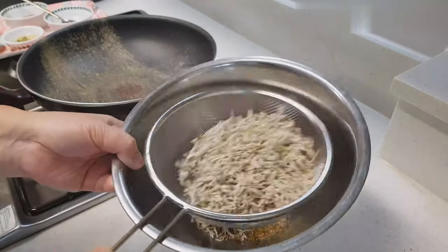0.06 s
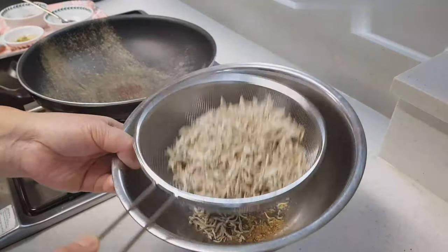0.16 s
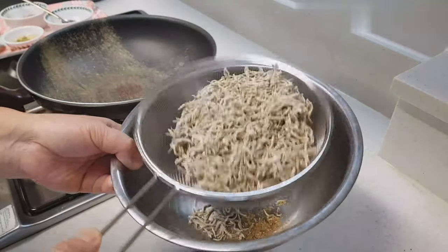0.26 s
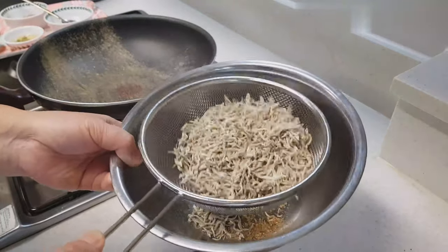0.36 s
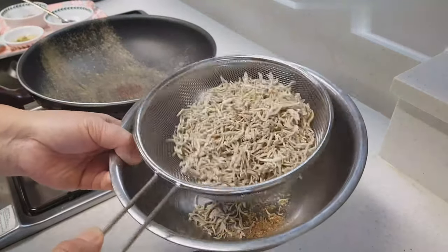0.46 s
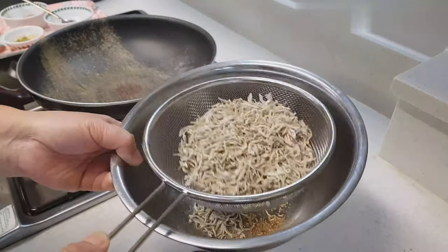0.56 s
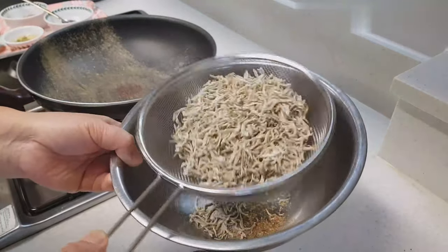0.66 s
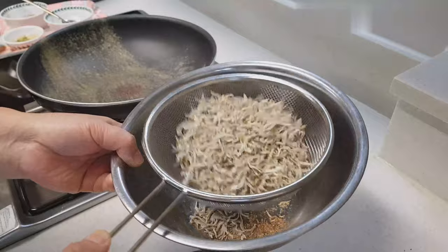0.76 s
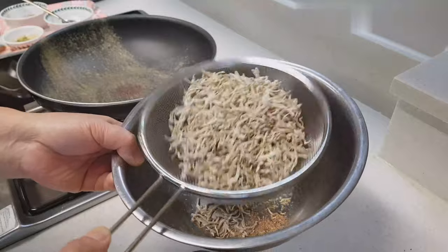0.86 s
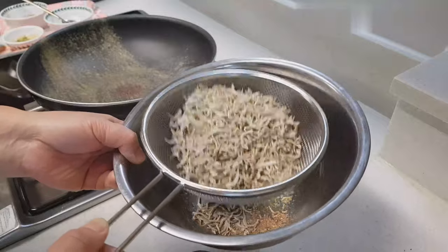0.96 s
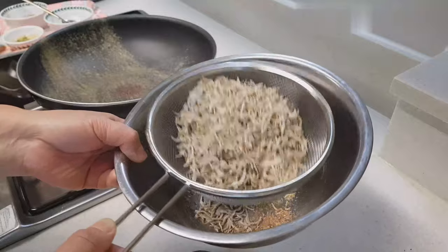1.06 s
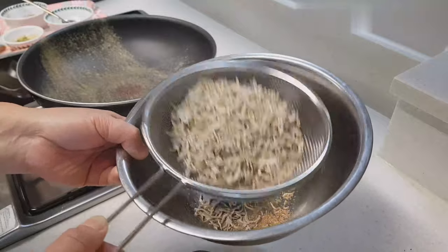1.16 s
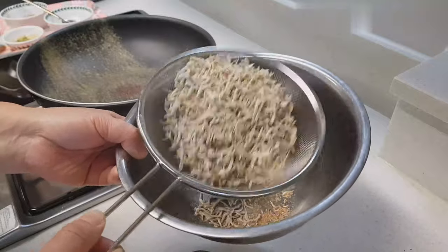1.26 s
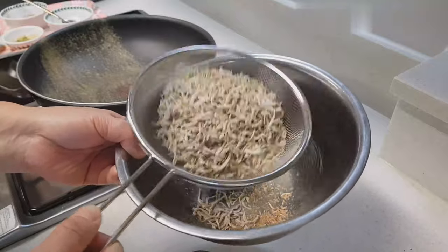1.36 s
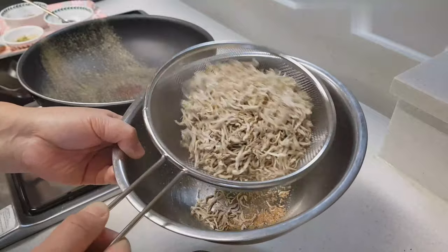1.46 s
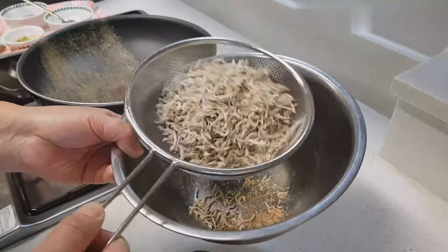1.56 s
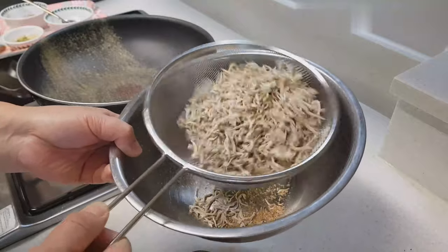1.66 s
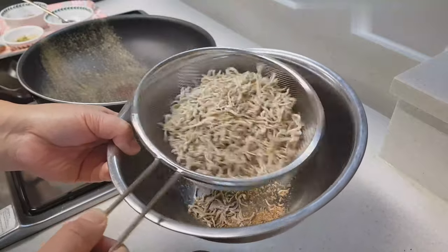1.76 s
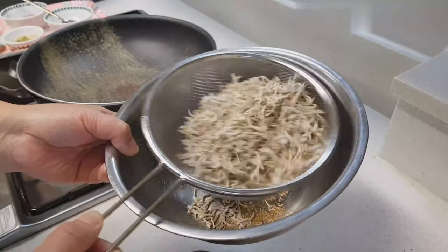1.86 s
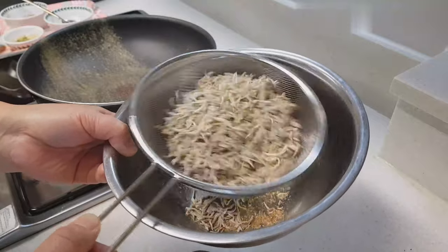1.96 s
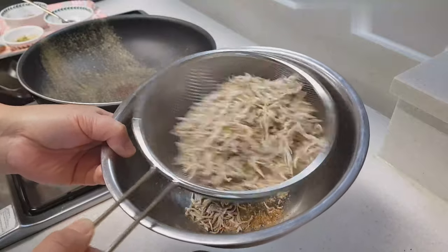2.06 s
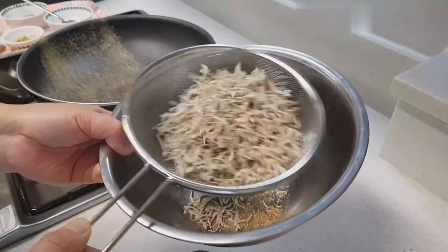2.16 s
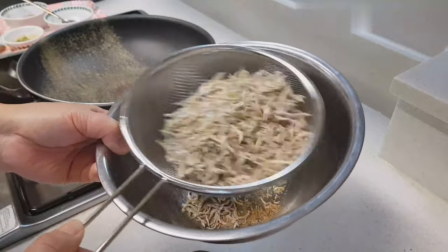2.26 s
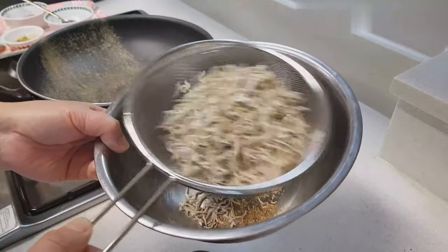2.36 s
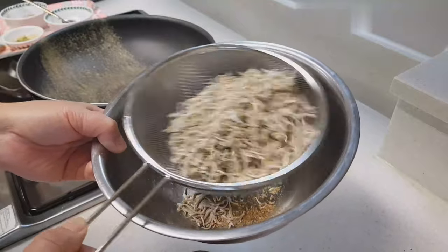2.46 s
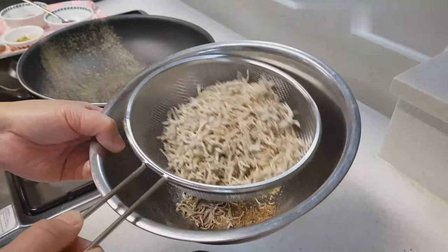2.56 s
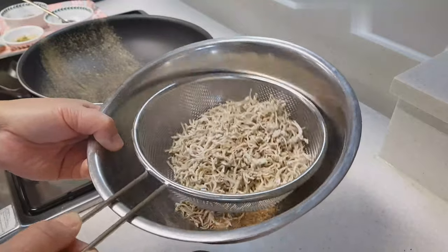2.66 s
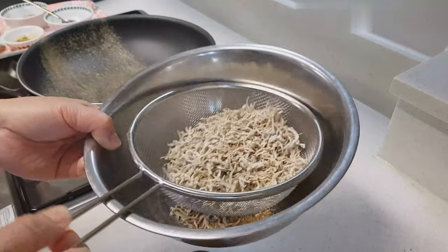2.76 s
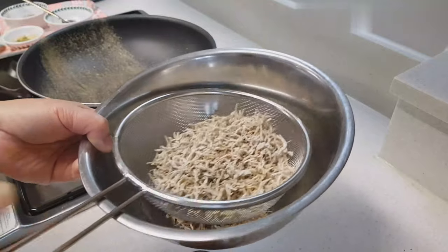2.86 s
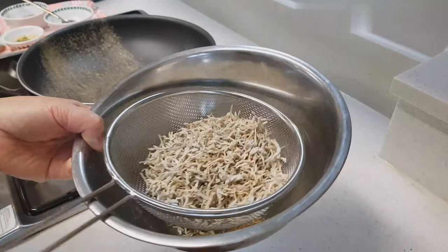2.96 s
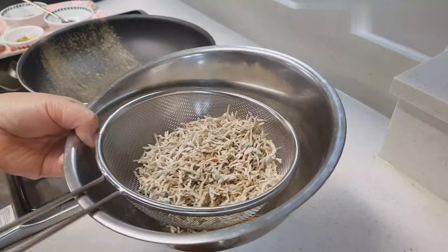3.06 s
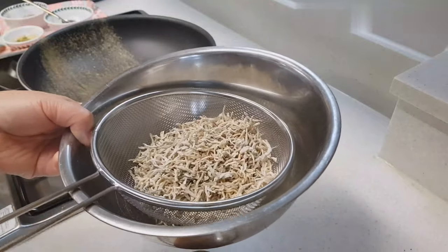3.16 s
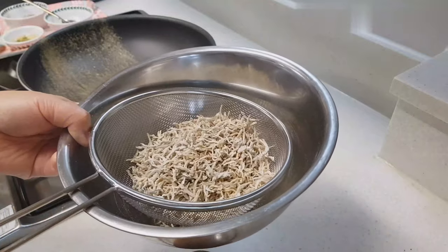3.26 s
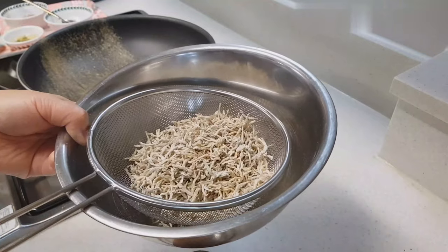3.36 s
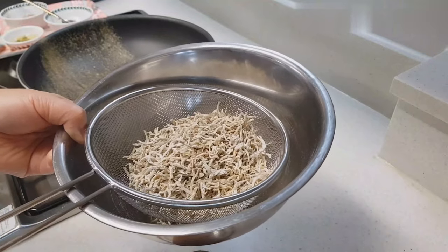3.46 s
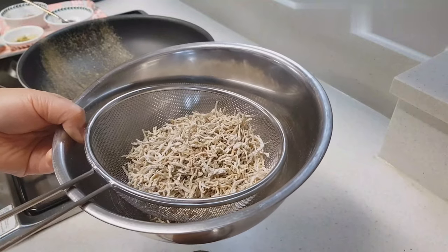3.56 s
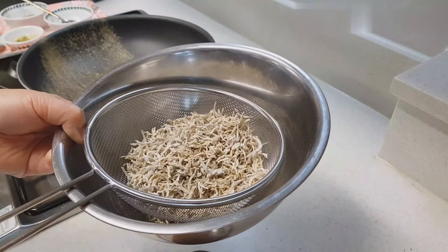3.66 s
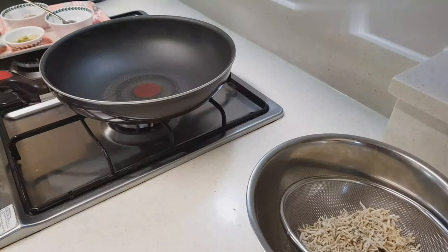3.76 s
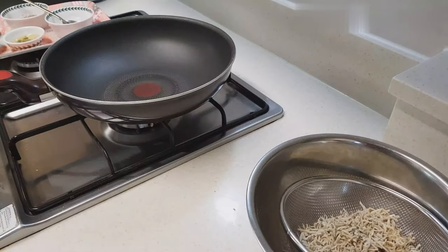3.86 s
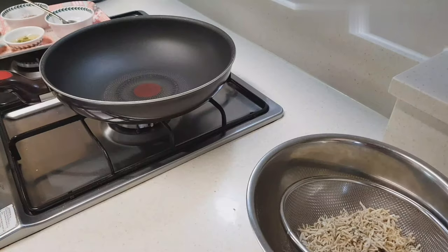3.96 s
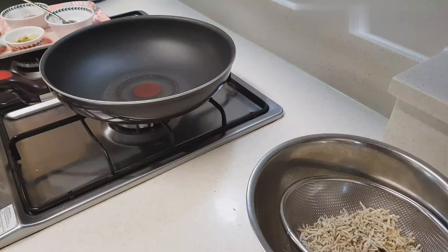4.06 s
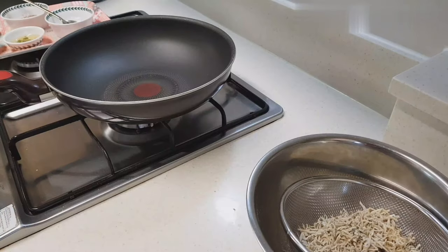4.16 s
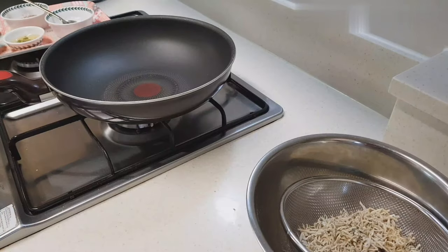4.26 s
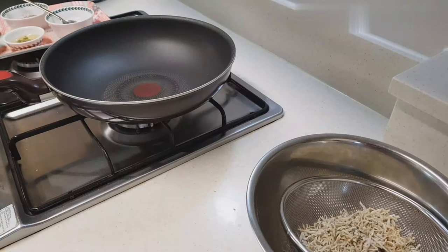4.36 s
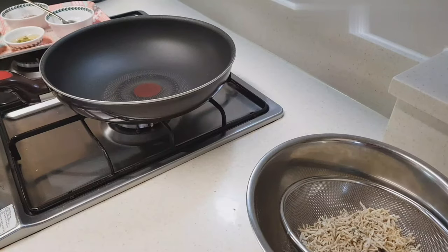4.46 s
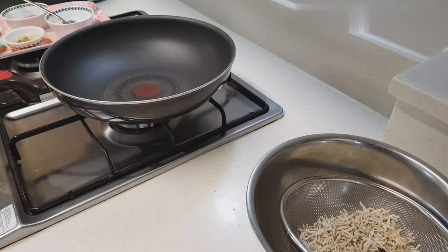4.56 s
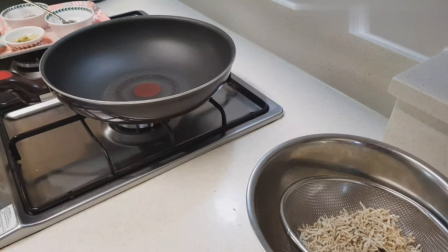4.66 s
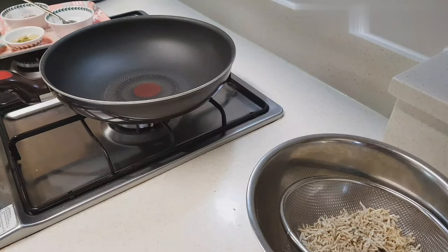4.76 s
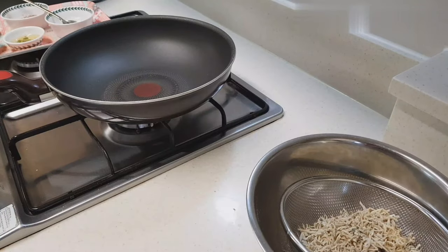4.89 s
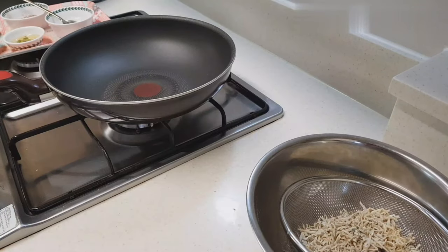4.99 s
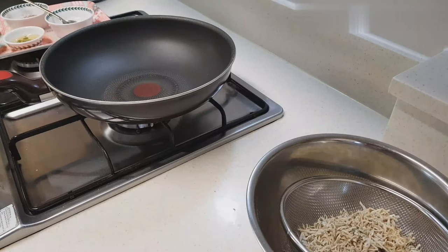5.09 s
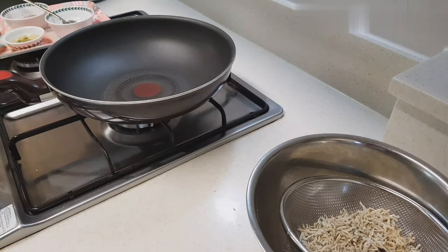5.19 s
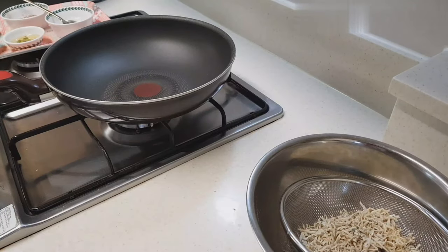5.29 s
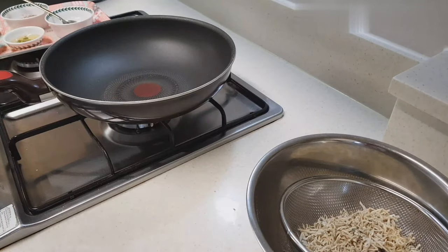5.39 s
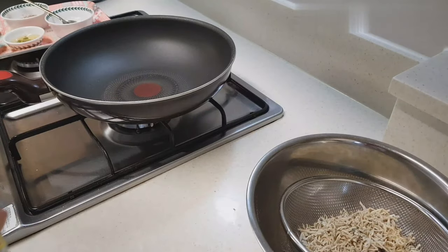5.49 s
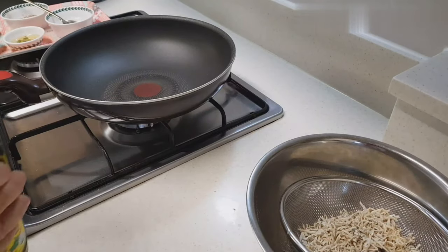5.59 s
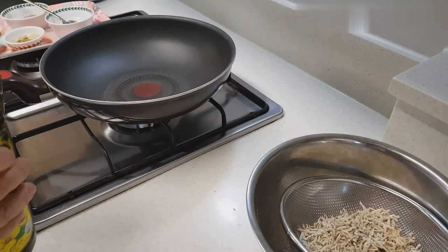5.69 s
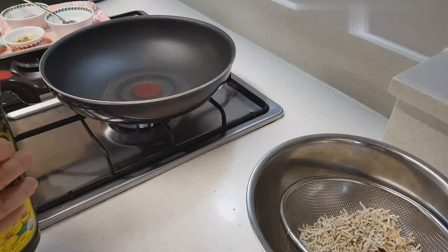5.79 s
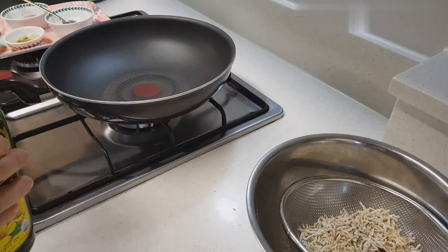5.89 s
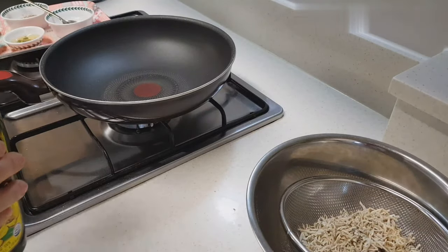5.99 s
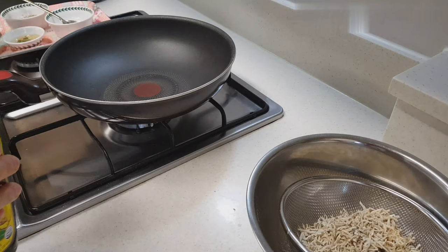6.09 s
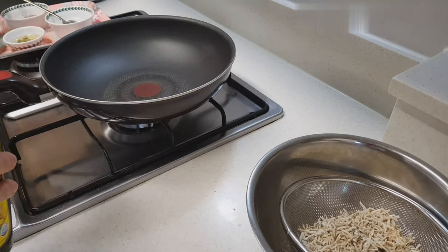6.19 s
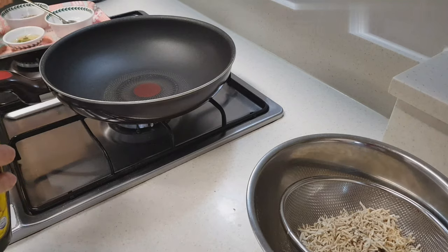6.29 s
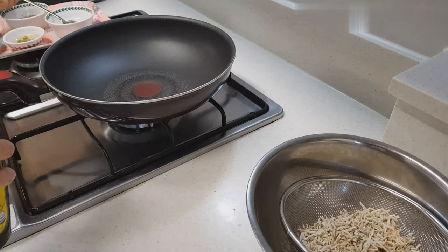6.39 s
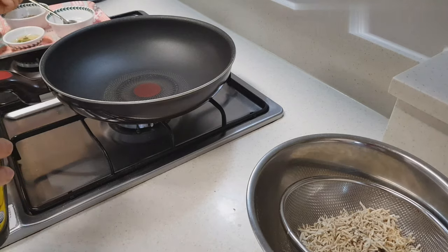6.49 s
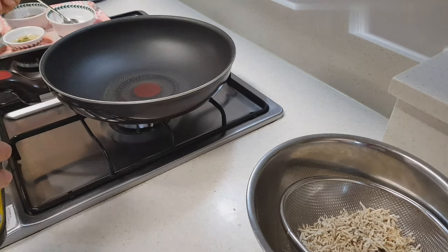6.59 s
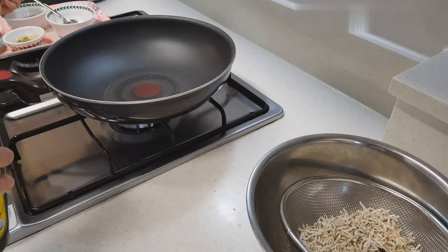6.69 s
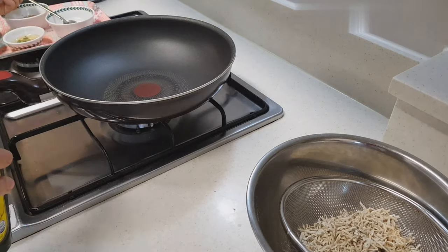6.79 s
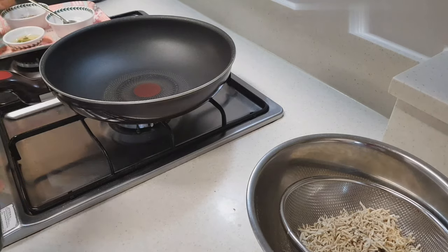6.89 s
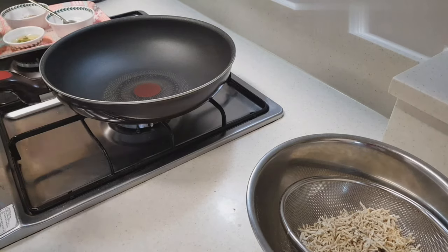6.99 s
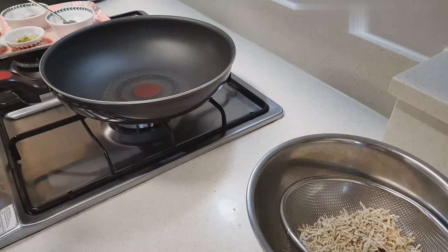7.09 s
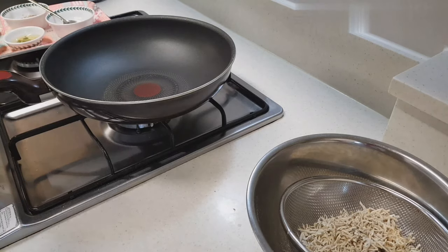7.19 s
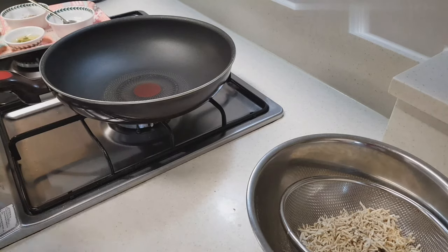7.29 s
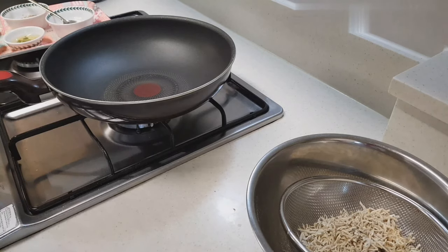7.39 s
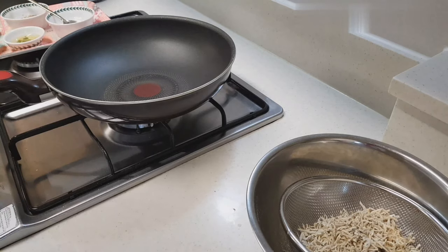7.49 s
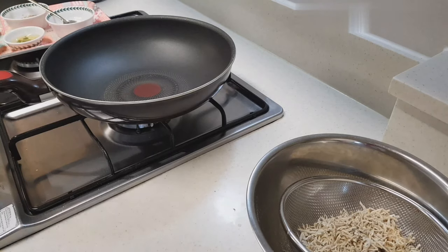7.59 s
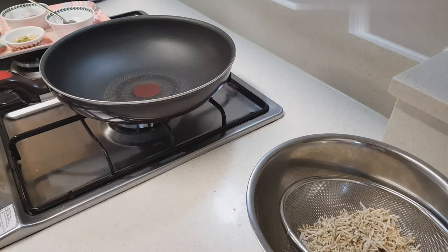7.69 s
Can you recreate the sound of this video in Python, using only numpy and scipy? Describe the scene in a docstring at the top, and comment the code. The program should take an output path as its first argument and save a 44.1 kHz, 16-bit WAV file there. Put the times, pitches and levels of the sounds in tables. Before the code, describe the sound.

In a small kitchen, a cooker hood gives a steady low hum and soft rush of air. Close by, tiny dried fish swish repeatedly over wire mesh while the strainer taps a steel bowl, ending in louder ringing knocks. The sound cuts out briefly. The hum returns with light ticks, a hard clack, soft brushing and the short, dull clatter of something being set down.

```python
"""A small kitchen, under a humming cooker hood: dried anchovies are tossed in a wire strainer over a
steel bowl. The fish hiss over the mesh in thousands of tiny contacts; the strainer clinks on the bowl
and is dropped into it, so the bottom thumps and the wall rings. After a short silent break, things are
handled and put down beside the stove: faint ticks, soft brushing, one bright clack and a dull clatter."""
import sys
import numpy as np
from scipy import signal
from scipy.fft import rfft, irfft, next_fast_len
from scipy.io import wavfile
from scipy.ndimage import map_coordinates

SR = 44100
rng = np.random.default_rng(int(sys.argv[2]) if len(sys.argv) > 2 else 0)


def wrap_up_sound(samples):
    """Save the sound to the file named by the first command line argument, as 16-bit audio."""
    columns = np.atleast_2d(samples).T
    # keep every value between -1 and 1, then stretch to whole-number steps
    tamed = np.clip(columns, -1, 1)
    steps = np.round(tamed * 32767).astype(np.int16)
    wavfile.write(sys.argv[1], SR, steps)


N = 341334
TIME = np.arange(N) / SR


def from_db(db):
    return 10 ** (np.asarray(db) / 20)


def unit_rms(x):
    return x / np.sqrt(np.mean(x ** 2) + 1e-20)


def white():
    return rng.standard_normal((2, N))


def pan(x, right_db):
    """Place a sound so that the right side is right_db above the left."""
    return x * from_db(np.array([[-right_db], [right_db]]) / 2)


def at_hz(points, hz):
    """Read a curve on a log-frequency axis."""
    f, value = np.transpose(points)
    return np.interp(np.log(hz + 1), np.log(f), value)


def coloured(source, spectrum, correlation, peaks=()):
    """Give two unrelated signals an EQ curve, a stereo width and resonant peaks; rms 1."""
    size = next_fast_len(N)
    hz = np.arange(size // 2 + 1) * SR / size
    peaks_db = sum(db / (1 + (2 * (hz - f) / width) ** 2) for f, width, db in peaks)
    mid, side = rfft(source, size) * from_db(at_hz(spectrum, hz) + peaks_db)
    alike = np.clip(at_hz(correlation, hz), -1, 1)
    stereo = np.sqrt(1 + alike) * mid + np.sqrt(1 - alike) * side * [[1], [-1]]
    return unit_rms(irfft(stereo, size)[:, :N])


def band(x, low_hz, high_hz):
    """One register of a sound; rms 1."""
    sos = signal.butter(2, [low_hz, min(high_hz, .45 * SR)], "band", fs=SR, output="sos")
    return unit_rms(signal.sosfilt(sos, x))


def drift(per_s):
    """Random modulation gliding through per_s values a second; rms 1."""
    knots = rng.standard_normal(2048)
    return unit_rms(map_coordinates(knots, [TIME * per_s], order=1, mode="wrap"))


def ring(clicks, hz, t60):
    """A unit click sets a sine of height 1 ringing."""
    r, w = from_db(-60 / (t60 * SR)), 2 * np.pi * hz / SR
    return signal.lfilter([0, np.sin(w)], [1, -2 * r * np.cos(w), r * r], clicks + 1e-18)


def blows(times, levels_db, rise, t60):
    """Envelope of blows that build up during the contact and then die away; they add in power."""
    power, age = np.zeros(N + SR), np.arange(SR // 2) / SR
    for s, db, contact in zip(times, levels_db, np.broadcast_to(rise, len(times))):
        start = int(s * SR)
        attack = 1 - np.exp(-age / max(contact, 1e-4))
        power[start:start + len(age)] += (attack * from_db(db - 60 * age / t60)) ** 2
    return np.sqrt(power[:N])


def strokes(rows, sag_db_per_s, fade_db_per_s):
    """Envelope of strokes: each gains 20 dB over its swell, sags while it slides, then fades."""
    power = 1e-14
    for s, swell, db, slide in rows:
        age = TIME - s - swell
        shape_db = 20 * np.minimum(age, 0) / max(swell, 1e-3)
        shape_db -= sag_db_per_s * np.clip(age, 0, slide) + fade_db_per_s * np.maximum(age - slide, 0)
        power = power + from_db(np.maximum(db + shape_db, -150)) ** 2
    return np.sqrt(power)


def kitchen(x, t60, wet_db, predelay_s=0.0026):
    """Hard walls close by return a short dense tail, different on each side."""
    age = np.arange(SR // 2) / SR
    tail = rng.standard_normal((2, len(age))) * from_db(-60 * age / t60) * (age > predelay_s)
    tail /= np.sqrt(np.sum(tail ** 2, axis=1, keepdims=True))
    return x + from_db(wet_db) * signal.fftconvolve(x, tail, axes=1)[:, :N]


# the hood's level as it changes over time: t/s, fan level/dB, air level/dB
HOOD_LEVELS = [(0, -36, -50), (1.6, -37.5, -50), (2.3, -33.5, -47), (3.0, -35.5, -48), (3.8, -36, -48.5),
               (4.0, -33.5, -46), (5.2, -33, -46.5), (5.8, -35, -47), (7.7, -34, -46.5)]
# EQ of the fan's rumble: f/Hz, level/dB
RUMBLE_EQ = [(20, -37), (40, -28), (60, -17), (76, 0), (84, -5), (95, -3.5), (108, -18), (130, -11),
             (162, -4), (198, -22.5), (238, -12.5), (300, -23.5), (400, -54.5), (700, -57.5)]
# EQ of the rushing air: f/Hz, level/dB
AIR_EQ = [(180, -21), (280, -8.5), (345, -6), (480, -4), (560, 0), (740, -3.5), (850, -11.5), (1400, -9.5),
          (1800, -13.5), (2250, -16.5), (2700, -14.5), (3300, -19.5), (8000, -30), (16000, -41)]
# resonances of the duct: f/Hz, width/Hz, boost/dB
DUCT_PEAKS = [(458.5, 34, 4), (522, 55, 7), (597, 21, 4.5), (670, 49, 2), (902, 30, 7.5), (956, 32, 7),
              (1048, 16, 3.5), (1076, 50, 9.5), (1201, 38, 5.5), (1283, 30, 7.5), (1450, 80, 6.5),
              (1723, 47, 6), (1915, 43, 7.5), (2088, 100, 7), (2430, 77, 4.5)]
# partials of the motor hum: f/Hz, level against the fan level/dB, pan right/dB
MOTOR_PARTIALS = [(119.54, .5, 2.0), (239.4, -21.5, -2)]
# stereo image of the hood, wider toward the top: f/Hz, left-right correlation
HOOD_IMAGE = [(60, 1), (150, 1), (260, 0.75), (550, 0.61), (1000, 0.24), (2000, 0.1), (16000, 0)]

def hood(rumble_gain_db=-2, air_gain_db=4, waver_db=1.0, waver_radians=0.15):
    """The bed: the motor hums over the low rumble of the fan; air rushes through the duct."""
    times, *levels = np.transpose(HOOD_LEVELS)
    fan_db, air_db = (np.interp(TIME, times, level) for level in levels)
    rumble = from_db(fan_db + rumble_gain_db) * coloured(white(), RUMBLE_EQ, HOOD_IMAGE)
    air = from_db(air_db + air_gain_db) * coloured(white(), AIR_EQ, HOOD_IMAGE, DUCT_PEAKS)
    hum = 0
    for hz, db, right_db in MOTOR_PARTIALS:
        tone = np.sqrt(2) * np.sin(2 * np.pi * hz * TIME + waver_radians * drift(3.8))
        hum = hum + pan(tone * from_db(fan_db + db + waver_db * drift(9)), right_db)
    return hum + rumble + pan(air, right_db=0.3)


# faint dry ticks: t/s, level/dB
TICK_CUES = [(4.335, -40), (4.5062, -44), (4.6464, -41), (4.823, -38)]
# soft brushing strokes: t/s, swell/s, level/dB, slide/s
BRUSH_CUES = [(5.62, 0.044, -58, .005), (5.7, 0.1, -55, .015), (7.33, .16, -54, .13)]
# crisp EQ of ticks and brushing: f/Hz, level/dB
HANDLING_EQ = [(2000, -6), (5000, -2), (8000, 1), (9500, -4), (12000, 1.5), (15500, -9.5)]
# stereo image of this and all the other close sounds: f/Hz, left-right correlation
CLOSE_IMAGE = [(300, 0.9), (600, 0.81), (1200, -0.1), (3500, -0.24), (16000, 0.05)]

def handling(tick_db=-9, brush_db=-1):
    """Things tick and brush softly as they are handled."""
    times, level_db = np.transpose(TICK_CUES)
    ticks = blows(times, level_db + tick_db, rise=.001, t60=.13)
    brushing = from_db(brush_db) * strokes(BRUSH_CUES, sag_db_per_s=50, fade_db_per_s=130)
    return (ticks + brushing) * coloured(white(), HANDLING_EQ, CLOSE_IMAGE)


# knocks beside the stove: t/s, low level/dB, mid level/dB, high level/dB, contact/s
KNOCK_CUES = [(6.523, -35.5, -34.5, -47, 0.0027), (6.822, -20, -14, -25.5, 0.01),
              (6.833, -26, -25.5, -42, .004), (6.869, -23.5, -21.5, -32.5, 0.0052)]
# hollow EQ of that clatter: f/Hz, level/dB
KNOCK_EQ = [(250, -19), (480, -17.5), (620, -1), (740, 1.5), (900, 2), (1150, -7.5), (1400, -5),
            (1700, -9.5), (2500, -13), (3300, -14.5), (4500, -9.5), (10000, -24), (13000, -26.5),
            (15500, -46)]

def knocks(low_db=3, mid_db=3, high_db=4):
    """Something is set down and rocks with a dull clatter; the treble starts first and dies first."""
    times, low, mid, high, contact = np.transpose(KNOCK_CUES)
    body = coloured(white(), KNOCK_EQ, CLOSE_IMAGE)
    clatter = band(body, 250, 805) * blows(times, low + low_db, contact, t60=.14)
    clatter += band(body, 990, 3250) * blows(times, mid + mid_db, contact * 1.38, t60=0.11)
    clatter += band(body, 4100, SR / 2) * blows(times, high + high_db, contact * 0.43, t60=0.08)
    return pan(clatter, right_db=-0.5)


# one hard, bright clack beside the stove: t/s, body level/dB, treble level/dB
CLACK_CUE = (5.3455, -13, -20)
# EQ of the clack: f/Hz, level/dB
CLACK_EQ = [(250, -4.5), (450, -5), (720, -4.5), (1020, -1), (1350, -7), (1830, 2.5), (2050, -4.5),
            (2400, 1), (3100, -5.5), (4200, -13), (5800, -13), (7000, -19), (9200, -17), (15500, -26)]

def clack(crack_db=6):
    """A crack of a few milliseconds, then the struck body dies away."""
    s, body_db, treble_db = CLACK_CUE
    noise = coloured(white(), CLACK_EQ, CLOSE_IMAGE)
    body = band(noise, 210, 3300) * blows([s], [body_db], rise=0.00061, t60=0.088)
    treble = band(noise, 3700, 19000) * blows([s], [treble_db], rise=0.001, t60=0.15)
    crack = noise * blows([s], [body_db + crack_db], rise=0.00041, t60=0.0077)
    return pan(body + treble + crack, right_db=-1.5)


# the harder blows on the bowl: t/s, level/dB, f/Hz
THUMP_CUES = [(1.137, -21, 537), (2.459, -38, 527), (2.67, -15, 528), (2.718, -12, 597),
              (2.963, -25.5, 550)]
# wall notes that sing on after a thump: f/Hz, level against the thump/dB, t60/s
THUMP_TAILS = [(658, -17.5, 0.14), (2590, -22.5, 0.13)]

def bowl_bottom(gain_db=5, rise=.002, t60=0.036):
    """The flat bottom flexes: a hollow note, damped by hand and fish; the wall sings a little longer."""
    note = 0
    for s, db, hz in THUMP_CUES:
        note += blows([s], [db + gain_db], rise, t60) * np.sin(2 * np.pi * hz * (TIME - s))
    times, thump_db, _ = np.transpose(THUMP_CUES)
    for hz, db, wall_t60 in THUMP_TAILS:
        note += blows(times, thump_db + db, rise, wall_t60) * np.sin(2 * np.pi * hz * TIME)
    return pan(note, right_db=0)


# strainer hits on the bowl: t/s, body level/dB, ring level/dB, wire level/dB, contact/s
CLINK_CUES = [(0.143, -48, -40.5, -43, 0.00063), (0.71, -60, -51, -40.5, .0005),
              (0.842, -56, -51, -42.5, .001), (0.89, -58, -52, -50, 0.00092),
              (1.1374, -27.5, -19, -19.5, 0.0016), (1.575, -49, -48, -43.5, .0004),
              (1.8817, -40.5, -34.5, -36.5, 0.00087), (2.457, -26, -20, -17.5, 0.0022),
              (2.658, -35.5, -34, -32.5, 0.00064), (2.6698, -21.5, -15.5, -15.5, 0.00061),
              (2.717, -26.5, -25.5, -26, 0.0019), (2.797, -64, -42.5, -43.5, .001),
              (2.895, -43, -34.5, -36, 0.0012), (2.96, -37, -33, -33.5, 0.00074)]
# EQ of the steel's crowded modes: f/Hz, level/dB
STEEL_EQ = [(700, -11.5), (1400, -4), (2000, -13), (2900, 3.5), (3500, 1), (5200, -4.5), (6600, 2.5),
            (7400, 6), (8250, 10), (9100, -1.5), (11900, -2.5), (15500, -14)]

def strainer(body_db=2, ring_db=4, wire_db=5, chatter_db=0.5):
    """The rim hits the bowl: a crash of crowded, hand-damped modes."""
    times, body, rings, wire, contact = np.transpose(CLINK_CUES)
    steel = coloured(white(), STEEL_EQ, CLOSE_IMAGE)
    crash = band(steel, 860, 2760) * blows(times, body + body_db, contact * 0.45, t60=0.1)
    crash += band(steel, 3020, 5850) * blows(times, rings + ring_db, contact, t60=0.062)
    crash += band(steel, 7030, 17000) * blows(times, wire + wire_db, contact * 1.3, t60=0.068)
    chatter = from_db(chatter_db * drift(900))   # hard surfaces touch and part within one blow
    return pan(crash * chatter, right_db=1.3)


# long-ringing modes of the bowl: f/Hz, level/dB, t60/s
BOWL_MODES = [(573, -4, .24), (813, 0.5, 0.069), (1810, -9, 0.068), (2510, -12.5, 0.16), (3450, -9.5, 0.14),
              (4040, -11, .14), (4393, -19.5, .13), (5440, -13, .14), (7400, -13, .17), (7300, -13, .17),
              (7714, -12.5, 0.16), (8260, -13, .17), (12000, -16, .13)]

def bowl_wall(modes_db=-6, scatter_db=1.0):
    """A few modes ring on after each clink, each time with a strength and sign of their own."""
    times, body, rings, wire, _ = np.transpose(CLINK_CUES)
    ringing = 0
    for hz, db, t60 in BOWL_MODES:
        blow_db = (body if hz < 2800 else rings if hz < 6500 else wire) + db + modes_db
        sides = 1 if hz < 1000 else 2   # low modes are in phase on both sides
        strength = from_db(blow_db + scatter_db * rng.standard_normal((sides, len(times))))
        clicks = np.zeros((2, N))
        clicks[:, (times * SR).astype(int)] = strength * rng.choice([-1, 1], strength.shape)
        ringing = ringing + ring(clicks, hz, t60)
    return pan(ringing, right_db=1.5)


# tosses that send the fish sliding over the mesh: t/s, swell/s, level/dB, slide/s
TOSS_CUES = [ (-0.02, 0.017, -42.5, .005), (0.035, 0.037, -55, .07), (0.355, 0.019, -38.5, 0.029),
             (0.52, 0.078, -50, .015), (0.75, 0.034, -42.5, .04), (0.94, 0.034, -41, 0.027),
             (1.335, 0.012, -41, 0.046), (1.46, 0.057, -50, 0.14), (1.665, 0.047, -50, 0.12),
             (1.88, .05, -50.5, 0.092), (2.03, .07, -49, 0.11), (2.23, .085, -45, 0.036),
             (2.37, .025, -53, 0.06), (2.5, 0.054, -47.5, 0.028), (2.965, 0.017, -50, 0.0074), ]
# EQ of the fish's hiss: f/Hz, level/dB
FISH_EQ = [(1200, -24.5), (2800, -10.5), (4900, -10.5), (5300, -8), (5900, -7), (6500, -1), (7800, -2),
           (9500, -5), (12000, -6.5), (15500, -13)]
# colour that the wire mesh adds: f/Hz, width/Hz, boost or cut/dB
MESH_PEAKS = [(5330, 200, 5.5), (6770, 150, 6), (7100, 200, -1.5), (7760, 300, 2.5)]

def fish(peak_contacts_per_s=9000, size_spread_db=4.0, gain_db=3.0):
    """Thousands of tiny contacts with the wires; a faster slide makes more of them."""
    # friction slows each slide, then the heap comes to rest
    slide = strokes(TOSS_CUES, sag_db_per_s=46, fade_db_per_s=340)
    moving = slide > from_db(-85)
    rate = peak_contacts_per_s * np.sqrt(slide / slide.max())
    contacts = (rng.random((2, N)) < rate / SR) * white()
    sizes = from_db(size_spread_db * np.minimum(rng.exponential(1, (2, N)), 4))
    grains = contacts * sizes * moving / np.sqrt(rate)   # equal power at any density
    hiss = coloured(kitchen(grains, t60=.12, wet_db=7.5), FISH_EQ, CLOSE_IMAGE, MESH_PEAKS)
    hiss /= np.sqrt(np.mean(hiss[:, moving] ** 2))
    return pan(hiss * slide * from_db(gain_db), right_db=.6)


def scene():
    """The mix: hood bed, foley beside the stove, steel bowl and strainer, fish."""
    clinks = kitchen(strainer(), t60=0.24, wet_db=-6.5) + bowl_wall()
    thumps = kitchen(bowl_bottom(), t60=0.13, wet_db=-1.5)
    beside_stove = kitchen(knocks() + clack(), t60=0.25, wet_db=-4)
    return hood() + handling() + beside_stove + thumps + clinks + fish()


# the silent break: start t/s, end t/s
MUTE = (3.783, 4.035)

def record(dry, cutoff_hz=15800):
    """The sound mutes for a moment and comes back; a steep low-pass cuts the top."""
    stop, resume = MUTE
    gate = np.interp(TIME, [stop, stop + .002, resume - .01, resume + .004], [1, 0, 0, 1])
    low_pass = signal.ellip(10, .1, 90, cutoff_hz, fs=SR, output="sos")
    return signal.sosfilt(low_pass, dry * gate + 1e-18)


dry = scene()
out = record(dry)
wrap_up_sound(out)
```